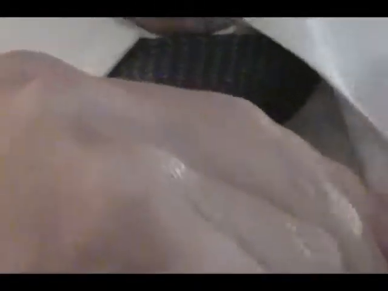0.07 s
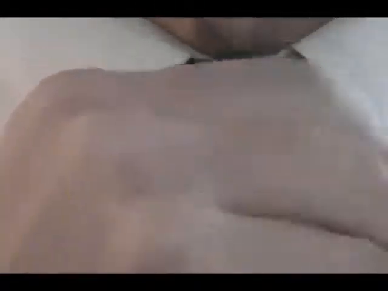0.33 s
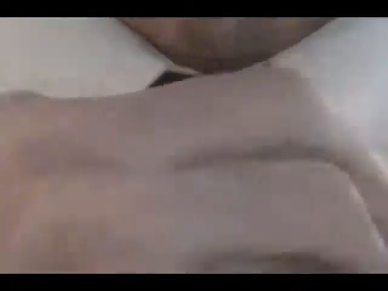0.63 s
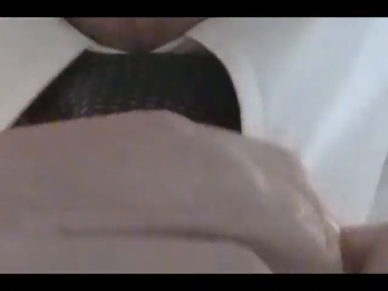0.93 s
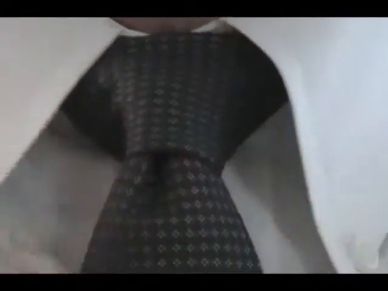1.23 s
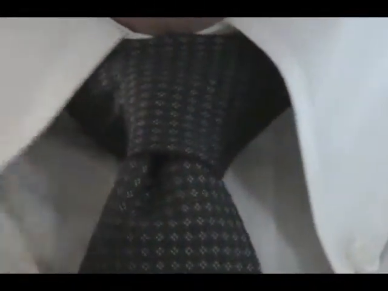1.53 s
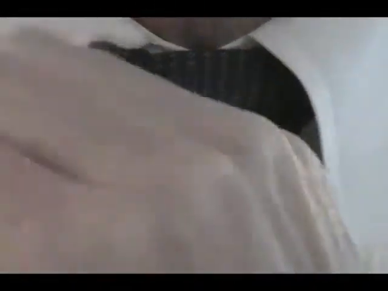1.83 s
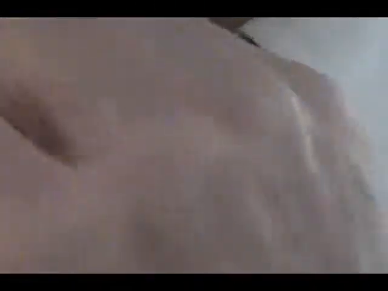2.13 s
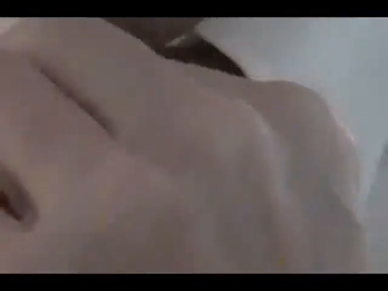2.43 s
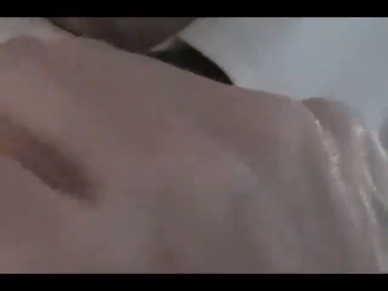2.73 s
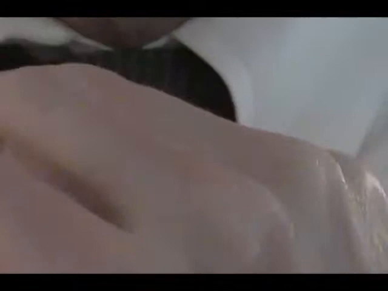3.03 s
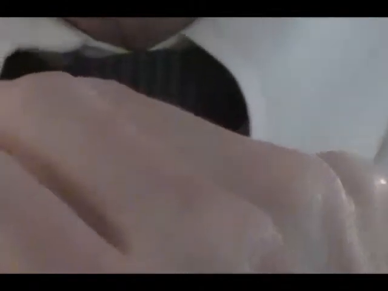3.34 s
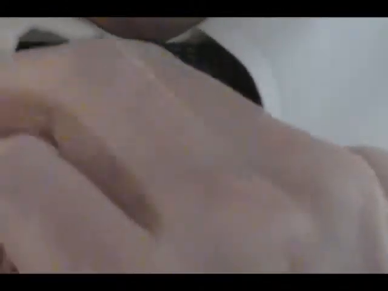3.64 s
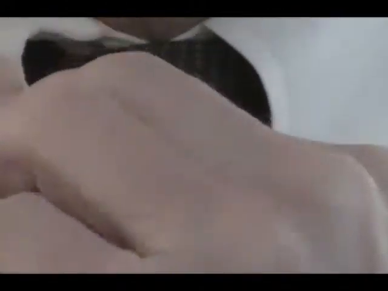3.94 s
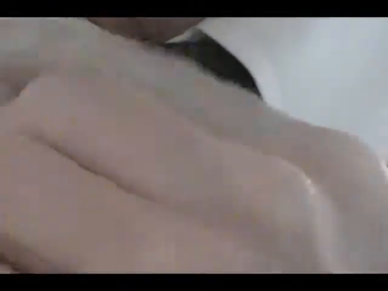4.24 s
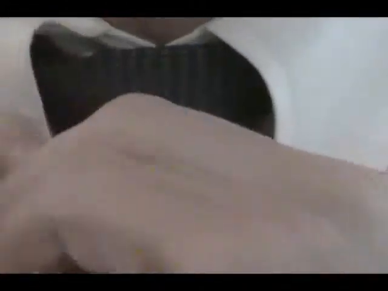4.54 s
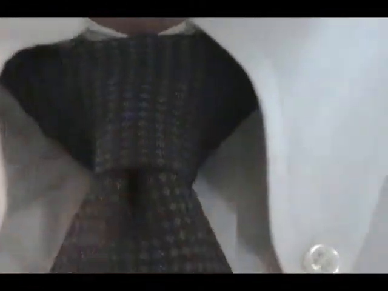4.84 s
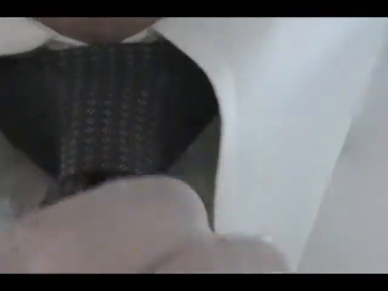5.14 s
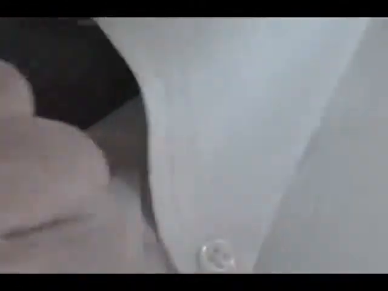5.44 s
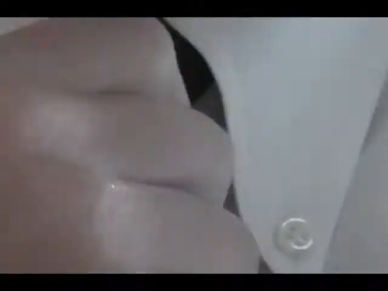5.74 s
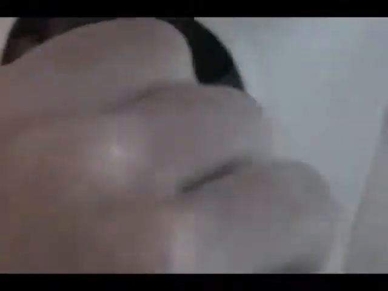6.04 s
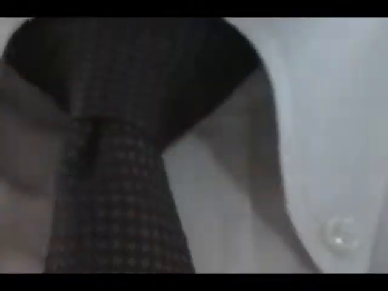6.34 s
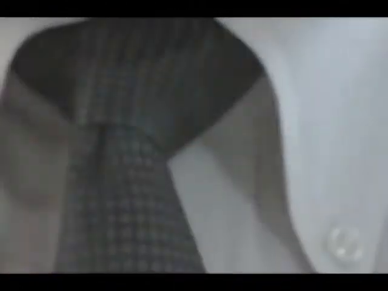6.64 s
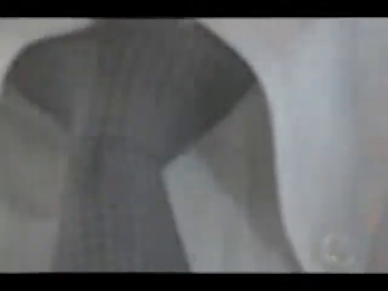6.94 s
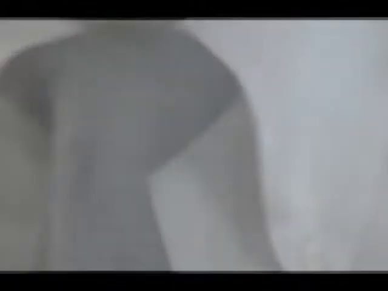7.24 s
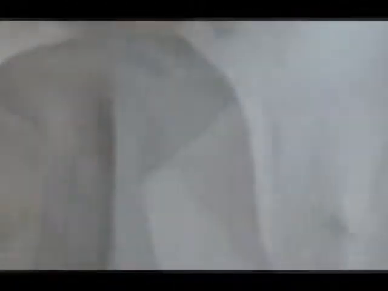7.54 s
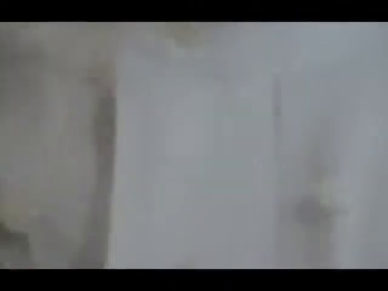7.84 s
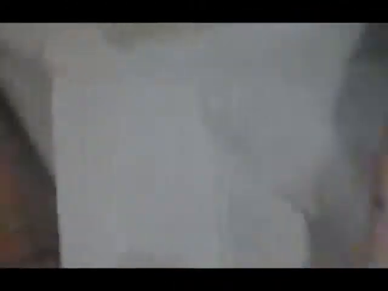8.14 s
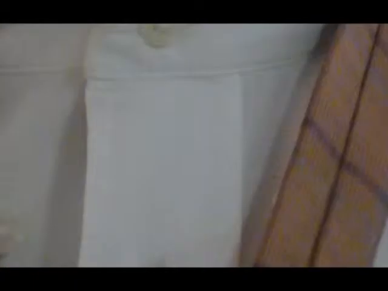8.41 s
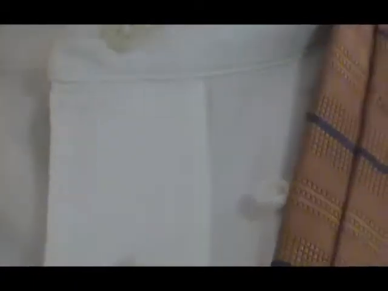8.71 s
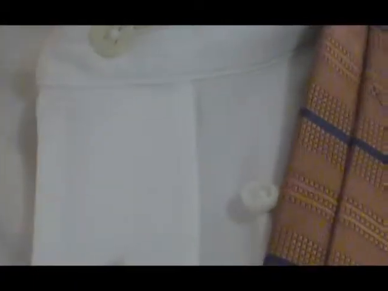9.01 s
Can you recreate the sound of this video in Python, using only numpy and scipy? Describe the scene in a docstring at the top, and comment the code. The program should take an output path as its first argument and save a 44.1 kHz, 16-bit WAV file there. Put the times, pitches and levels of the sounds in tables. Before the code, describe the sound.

Necktie fabric swishes and rasps against a collar in uneven pulls, easing briefly, then returning stronger in a quiet room.

```python
"""Hands snug a necktie knot against a shirt collar, close to one microphone in a quiet room.
From the start, low room noise and a faint electrical buzz lie under pulls of the tie. Threads catch and
slip in tiny clicks: the weave hisses, the cloth layers rasp, the shirt front rumbles softly. Creases snap
and fingers scuff now and then. After a lull around 4 s the pulls return stronger. Near 8 s come a brief,
faint hum and then a thin rising whistle, before the last pulls ease off."""
import sys
import numpy as np
from scipy import signal
from scipy.fft import rfft, irfft, next_fast_len
from scipy.io import wavfile

SR = 44100
rng = np.random.default_rng(int(sys.argv[2]) if len(sys.argv) > 2 else 0)


def transcribe(signal):
    """Save signal, clipped to [-1, 1], as a 16-bit WAV file at the path in sys.argv[1]."""
    frames = np.atleast_2d(signal).T
    limited = np.clip(frames, -1, 1)
    pcm = np.round(limited * 32767).astype(np.int16)
    wavfile.write(sys.argv[1], SR, pcm)


N = 404397
TIME = np.arange(N) / SR


def undb(db):
    """Turn decibels into a number to multiply by."""
    return 10 ** (np.asarray(db) / 20)


def unit(x):
    """Scale a sound to an average strength (rms) of 1."""
    return x / np.sqrt(np.mean(x ** 2))


def curve(rows, column=1):
    """Join the values in one table column with straight lines over time."""
    rows = np.asarray(rows)
    return np.interp(TIME, rows[:, 0], rows[:, column])


def wander(per_s):
    """Drift to a new random value per_s times a second, at strength 1."""
    targets = rng.standard_normal(4096)
    return unit(np.interp(TIME * per_s, np.arange(len(targets)), targets))


def colour(x, spectrum):
    """Turn each frequency up or down as the spectrum says, then scale to strength 1."""
    hz, db = np.transpose(spectrum)
    size = next_fast_len(N)
    freqs = np.maximum(np.fft.rfftfreq(size, 1 / SR), 1)
    gain = undb(np.interp(np.log(freqs), np.log(hz), db))
    return unit(irfft(rfft(x, size) * gain, size)[:N])


def resonate(x, hz, width_hz):
    """Let a sound ring in a band around hz, at strength 1."""
    top = min(np.hypot(hz, width_hz / 2) + width_hz / 2, SR / 2 - 1000)
    band = signal.butter(2, [top - width_hz, top], "bandpass", fs=SR, output="sos")
    return unit(signal.sosfilt(band, x))


def room():
    """The room makes a steady low noise and the microphone adds a little hiss."""
    # colour of the noise: f/Hz, relative level/dB
    spectrum = [(20, -16), (45, -15.5), (80, -3.5), (130, 0.5), (220, -1), (380, -2.5), (520, -5.5),
                (750, -6), (1200, -8), (2200, -9.5), (5000, -13), (10500, -7.5), (13000, -12),
                (16000, -25.5)]
    return colour(rng.standard_normal(N), spectrum) * undb(-44.5 + 0.092 * wander(3.4))


def buzz(blips_per_s=59.96, jitter_cycles=0.012):
    """Electrical interference makes a fast row of blips; every other one also rings lower."""
    # loudness of the buzz: t/s, level/dB
    levels = [(0, -50.5), (.7, -50.5), (1, -52), (1.3, -47.5), (1.8, -55), (2.4, -50.5), (2.9, -59),
              (4.2, -55), (5.5, -53), (6, -50), (6.7, -56), (7.3, -52), (8, -56), (9.17, -56)]
    count = int(TIME[-1] * blips_per_s) - 1
    timing, size = rng.standard_normal((count, 2)).T
    cycles = np.arange(count) + 0.3467 + np.clip(jitter_cycles * timing, -.25, .25)
    starts = (cycles / blips_per_s * SR).astype(int)
    every, alternate = np.zeros((2, N))
    every[starts] = undb(1.5 * size)
    alternate[starts[::2]] = every[starts[::2]]
    high = resonate(every, hz=953, width_hz=113)
    low = resonate(alternate, hz=812, width_hz=226)
    return unit(high + undb(-2) * low) * undb(curve(levels))


def catches(per_s, spread_db):
    """Threads catch and let go, making random clicks of uneven size."""
    caught = rng.random(N) < per_s / SR
    size = undb(spread_db * np.clip(rng.standard_normal(N), -2, 2))
    return unit(caught * rng.choice([-1, 1], N) * size)


def friction(per_s, spread_db, blur_db):
    """Rubbing gives separate clicks over the blur of countless finer fibres."""
    return unit(catches(per_s, spread_db) + undb(blur_db) * rng.standard_normal(N))


def shirt_front():
    """The shirt front rumbles softly as it is dragged along."""
    # colour of the rumble: f/Hz, relative level/dB
    spectrum = [(40, -24), (80, -11.5), (140, -1), (270, -1), (370, 0.5), (500, -3), (680, -0.5),
                (1000, -1.5), (1800, -4.5), (4000, -23)]
    # strength of the drag: t/s, relative level/dB
    drag = [(0, -52), (.55, -46), (1.35, -46), (1.6, -48), (2.6, -48), (3.3, -45.5), (3.7, -53),
            (4.75, -46.5), (6.4, -47.5), (6.5, -41.5), (7.15, -41.5), (7.3, -38), (7.6, -41.5),
            (8.1, -44.5), (8.5, -44), (9.17, -46.5)]
    rumble = colour(friction(per_s=500, spread_db=7.5, blur_db=1.5), spectrum)
    return rumble * undb(curve(drag) - 2.5)


def pulling():
    """Each pull speeds up and slows down, so the strength of hiss and rasp swells and fades."""
    # pulls of the tie; pressing harder gives more rasp:
    # fastest moment/s, speeding up/s, slowing down/s, relative hiss level/dB, rasp against hiss/dB
    pulls = [(.048, 0.024, 0.037, -42.5, -7), (.127, 0.031, 0.019, -39, -10), (.334, .14, .015, -45.5, -15),
             (.427, 0.082, .042, -39, -7), (.7, 0.24, .083, -41, -6), (.943, 0.12, 0.059, -37, -8),
             (1.066, 0.034, 0.086, -31, -7), (1.22, 0.096, .2, -37.5, -6.5), (1.31, 0.048, 0.094, -31, -8),
             (1.447, 0.035, 0.071, -33.5, -2.5), (1.754, .089, .059, -36, -7.5),
             (1.815, 0.036, 0.043, -34.5, -7), (1.92, .06, .1, -32.5, -8), (2.094, 0.057, 0.14, -39, -7.5),
             (2.28, .02, .03, -39, -10), (2.375, .06, .055, -34.5, -7.5), (2.509, 0.085, .057, -38.5, -6.5),
             (2.6, 0.014, .052, -41, -8), (2.73, .136, .054, -44, -3), (2.936, .22, .068, -49.5, 0),
             (3.028, .028, 0.081, -40.5, -5), (3.244, .03, .085, -41, -6), (3.484, 0.29, 0.066, -44, -2),
             (4.278, 0.012, .013, -39.5, -11), (4.36, 0.2, .3, -49.5, -9), (4.577, 0.13, 0.031, -40, -6.5),
             (4.716, 0.038, 0.1, -27, -8), (4.793, .12, 0.044, -31.5, -2.5), (4.882, .012, 0.11, -30, -9.5),
             (5.001, .022, .119, -33, -7.5), (5.096, 0.036, 0.16, -31, -8.5),
             (5.199, .033, 0.13, -33.5, -8), (5.309, 0.011, 0.067, -37, -2), (5.567, 0.15, 0.1, -35.5, -7),
             (5.718, 0.041, 0.063, -33.5, -6.5), (5.83, 0.036, 0.038, -38, -5.5),
             (5.955, 0.052, 0.037, -33.5, -6), (6.069, .049, 0.25, -36.5, -7.5),
             (6.315, 0.16, 0.097, -30, -7), (6.595, 0.32, 0.13, -29, -9), (6.8, 0.26, .1, -24.5, -12),
             (6.98, .11, 0.037, -28.5, -9.5), (7.088, 0.034, 0.042, -26, -14),
             (7.175, 0.037, 0.041, -34, -7), (7.335, 0.19, .06, -29, -7), (7.52, 0.33, 0.12, -28, -9),
             (7.624, .044, .3, -33.5, -6.5), (7.869, 0.13, .102, -26, -7), (8.088, .046, .035, -28, -4),
             (8.196, 0.18, 0.018, -25, -7), (8.305, 0.14, .071, -29, -6.5), (8.429, 0.023, .025, -32, -7),
             (8.561, 0.1, 0.082, -23, -8), (8.685, .03, 0.29, -29, -7.5), (8.86, 0.075, 0.16, -34.5, -13),
             (9.06, .137, 0.34, -37.5, -11)]
    hiss_power, rasp_power = undb(-61) ** 2, undb(-68) ** 2  # cloth stirs even under still hands
    t = TIME[::32]
    for peak_s, rise_s, fall_s, db, rasp_db in pulls:
        away = np.abs(t - peak_s) / np.where(t < peak_s, rise_s, fall_s)
        swell = undb(db) * np.exp(-away ** 1.26)  # a power of 1 is pointed, 2 is round
        hiss_power += swell ** 2
        rasp_power += (swell * undb(rasp_db)) ** 2
    return np.interp(TIME, t, np.sqrt(hiss_power)), np.interp(TIME, t, np.sqrt(rasp_power))


def tighten(x, tension, slack_hz, taut_hz, depth):
    """Tight cloth rings higher: tension turns a low band down and a high band up."""
    slack = signal.lfilter(*signal.iirpeak(slack_hz, Q=2, fs=SR), x)
    taut = signal.lfilter(*signal.iirpeak(taut_hz, Q=2, fs=SR), x)
    return unit(x + depth * tension * (taut - slack))


def tie():
    """The tie rubs on the collar; one uneven grip shakes both the weave's hiss and the layers' rasp."""
    # colour of the weave's hiss: f/Hz, relative level/dB
    weave_spectrum = [(2500, -24), (5000, -12.5), (6500, -6.5), (8000, -3), (9500, -1.2), (10800, 0),
                      (12500, -4.5), (14000, -11), (16000, -21)]
    # colour of the layers' rasp: f/Hz, relative level/dB
    layer_spectrum = [(300, -42), (600, -8.5), (1000, -3), (1500, 0.5), (2100, 0.5), (3000, -1.5),
                      (4200, -4.5), (6000, -11), (10000, -21)]
    # how tight the tie is: t/s, tension (-1 slack to 1 taut)
    tightness = [(0, 0.47), (.7, -0.39), (1.45, -0.095), (2.35, 0.29), (3.1, -0.29), (3.7, .1), (4.8, -.55),
                 (5.8, 0.45), (6.27, -0.55), (6.6, 0.48), (6.85, .85), (7.3, -.45), (7.7, 0.14),
                 (8.3, 0.12), (8.55, -0.16), (9.17, 0.52)]
    hiss_gain, rasp_gain = pulling()
    grip = wander(55)
    tension = curve(tightness) + 0.36 * wander(18)  # folds open and close
    threads = friction(per_s=2000, spread_db=1.0, blur_db=3.0)
    stray_threads = undb(-19) * catches(per_s=45, spread_db=1.0)
    weave = colour(threads + stray_threads, weave_spectrum)
    weave = tighten(weave, tension, slack_hz=7760, taut_hz=11600, depth=0.38)
    layers = colour(friction(per_s=1100, spread_db=2.5, blur_db=5.0), layer_spectrum)
    layers = tighten(layers, tension, slack_hz=1410, taut_hz=2780, depth=0.28)
    hiss = weave * hiss_gain * undb(0.92 * grip + 0.79 * wander(24) + 0.46)
    rasp = layers * rasp_gain * undb(0.47 * grip - 0.17)
    return hiss + rasp


def ring(hz, decay_ms):
    """A tiny ring that rises to a peak of 1 and dies away at once."""
    t = np.arange(512) / SR
    age = t * 1000 / decay_ms
    wave = age * np.exp(-2 * age) * np.sin(2 * np.pi * hz * t)
    return wave / np.abs(wave).max()


def crease_snaps():
    """A crease flips over with a bright ring, and the cloth around it knocks."""
    # creases and threads snapping:
    # t/s, ring peak/dB, ring f/Hz, ring decay/ms, knock f/Hz, knock against ring/dB
    snaps = [(0.322, -22.5, 7000, 0.18, 2600, -6), (0.368, -23, 9000, .3, 6000, 1),
             (0.5525, -24, 10600, .25, 3000, -10), (.6854, -16, 9700, 0.25, 4500, -17),
             (1.3078, -21, 10500, .2, 2600, 3), (1.4351, -11, 9000, 0.098, 1500, -13),
             (1.4625, -21, 8000, 0.14, 4000, -2), (2.3684, -17, 10500, 0.21, 2500, -10),
             (3.8828, -31, 6500, 0.33, 4000, -12), (4.281, -30, 10000, .3, 1700, 2),
             (4.3593, -20, 9700, 0.27, 3000, -20), (5.7488, -15.5, 2050, .75, 3030, -3.5),
             (6.970, -20, 9500, .2, 1700, 0), (7.1000, -11, 11700, .2, 2300, -12),
             (7.1851, -4.8, 11000, 0.26, 2250, -9.5), (7.4065, -14, 10500, .25, 2500, -20),
             (7.6243, -11, 9100, 0.21, 3000, -11), (8.5313, -17, 10000, .25, 2200, -16),
             (8.6150, -16, 10200, .2, 2000, -1), (8.6860, -13, 9500, 0.23, 2200, -9)]
    out = np.zeros(N)
    for start_s, db, hz, decay_ms, knock_hz, knock_db in snaps:
        knock = undb(knock_db) * ring(knock_hz, decay_ms=0.31)
        snap = undb(db) * (ring(hz, decay_ms) + knock)
        start = int(start_s * SR)
        out[start:start + len(snap)] += snap
    return out


def finger_scuffs():
    """Skin sticks and slips over a fold, which rings as the stroke swells, holds and fades."""
    # strokes over knot and collar: middle t/s, length/s, level/dB, centre f/Hz, band width/Hz
    strokes = [(1.064, 0.041, -39.5, 1300, 1200), (1.312, 0.045, -41, 2900, 1500),
               (1.34, 0.024, -37.5, 1590, 900), (1.363, 0.02, -36.5, 700, 1100),
               (1.455, 0.065, -32.5, 1127, 620), (1.456, 0.067, -35.5, 647, 139),
               (1.465, 0.035, -33.5, 5300, 3500), (2.623, 0.033, -43, 930, 200),
               (2.96, 0.045, -47, 1410, 700), (3.06, 0.049, -49, 1400, 400), (3.27, .05, -53, 1500, 1400),
               (3.676, 0.033, -47, 1020, 300), (4.716, 0.046, -40.5, 715, 350),
               (4.92, .05, -44, 3000, 2000), (5.102, 0.04, -38.5, 1590, 1100),
               (6.294, .05, -42, 3600, 1600), (6.487, 0.064, -37, 1050, 1210), (6.533, 0.19, -48, 150, 170),
               (6.797, 0.13, -41.5, 2700, 1400), (7.27, 0.069, -40, 620, 450),
               (7.315, 0.081, -41, 1200, 800), (7.434, .02, -39, 1250, 600),
               (7.93, 0.065, -37.5, 1650, 600), (8.072, 0.036, -39, 1000, 700),
               (8.128, .05, -38, 2300, 1000), (8.186, 0.029, -40, 960, 400), (8.326, 0.14, -43.5, 670, 200),
               (8.584, 0.031, -30, 2060, 800), (8.587, 0.046, -34, 1230, 400),
               (8.748, 0.19, -46.5, 630, 200)]
    out = np.zeros(N)
    slips = friction(per_s=1100, spread_db=6.0, blur_db=-14)
    for middle_s, length_s, db, hz, width_hz in strokes:
        near = np.abs(TIME - middle_s) < length_s
        swell = np.exp(-np.abs(1.75 * (TIME[near] - middle_s) / length_s) ** 3)
        out[near] += undb(db) * swell * resonate(slips[near], hz, width_hz)
    return out


def tone(path, waver):
    """A tone follows a path of pitch and level; its pitch wobbles by the fraction waver."""
    hz = curve(path, column=1) * (1 + waver * wander(200))
    sounding = (TIME > path[0][0]) & (TIME < path[-1][0])
    wave = np.sqrt(2) * np.sin(2 * np.pi * np.cumsum(hz) / SR)
    return sounding * wave * undb(curve(path, column=2))


def hum():
    """A faint, low hum swells and fades."""
    # path of the hum: t/s, f/Hz, level/dB
    path = [(7.55, 272, -80), (7.65, 270, -63), (7.8, 273, -58), (7.95, 270, -51), (8.08, 271, -54),
            (8.25, 274, -80)]
    return tone(path, waver=.02)


def whistle():
    """A thin, very high whistle slides upward."""
    # path of the whistle: t/s, f/Hz, level/dB
    path = [(8.3, 12700, -70), (8.35, 13100, -50), (8.4, 14500, -50), (8.44, 15100, -52),
            (8.48, 15250, -56), (8.52, 15200, -80)]
    return tone(path, waver=.005)


def scene():
    """Everything reaches one microphone, so left and right are the same."""
    background = room() + buzz()
    handling = shirt_front() + tie() + crease_snaps() + finger_scuffs()
    mono = background + handling + hum() + whistle()
    return np.array([mono, mono])


def record(dry, top_hz=15750):
    """A steep filter cuts off the highest treble."""
    return signal.sosfilt(signal.ellip(10, .1, 75, top_hz, fs=SR, output="sos"), dry)


dry = scene()
out = record(dry)
transcribe(out)
```